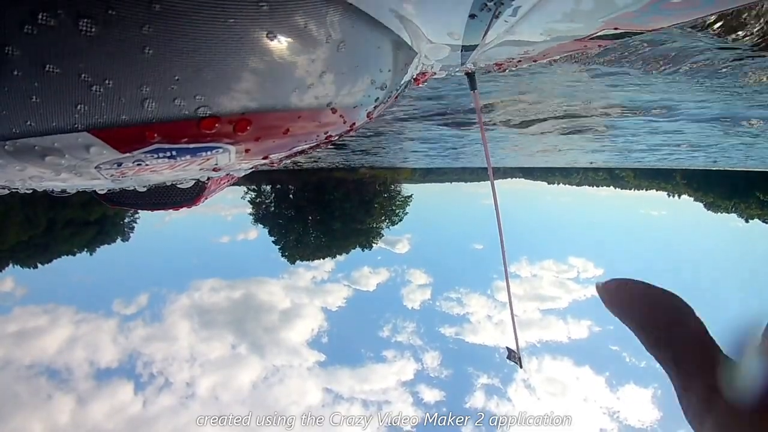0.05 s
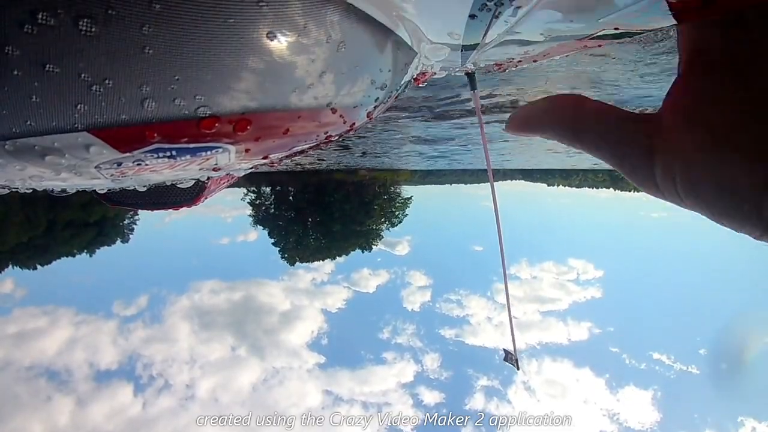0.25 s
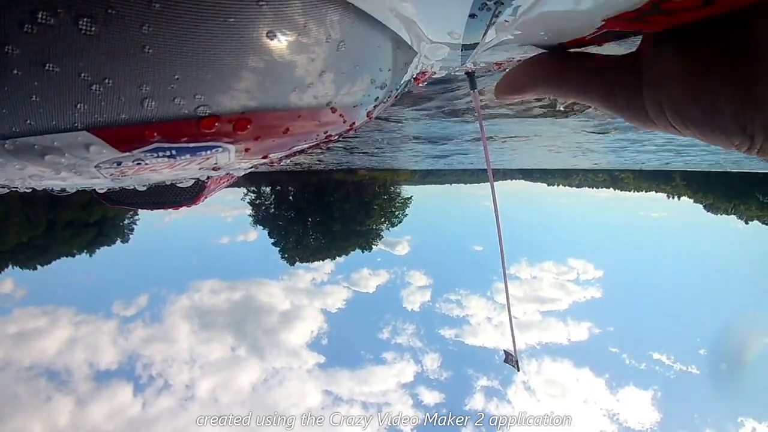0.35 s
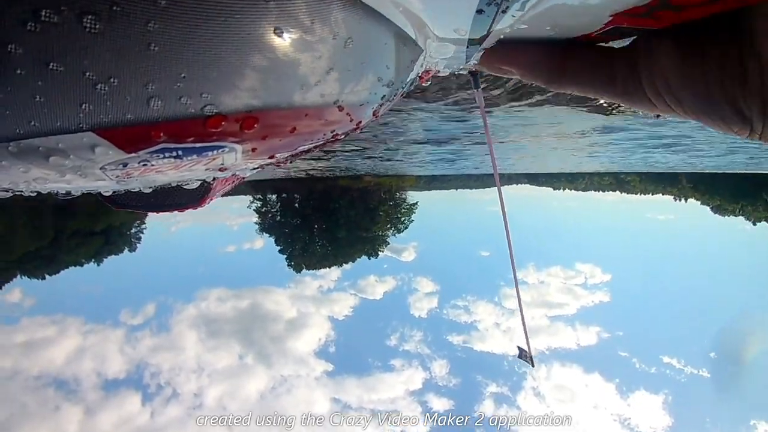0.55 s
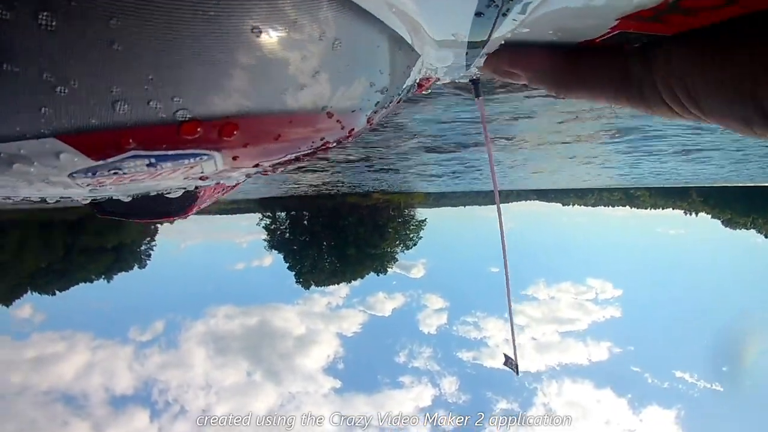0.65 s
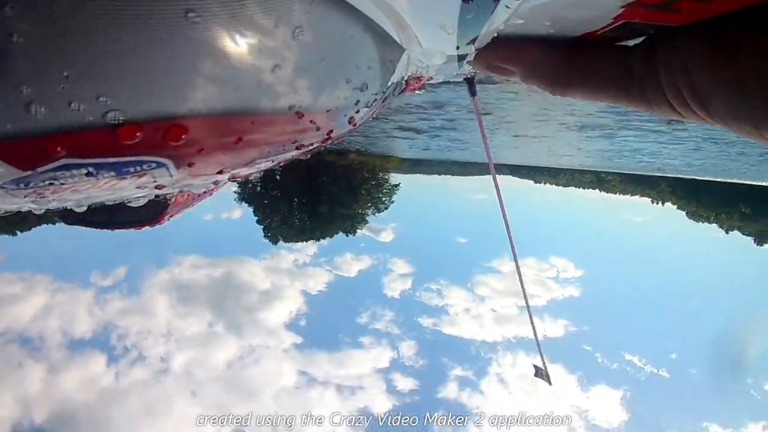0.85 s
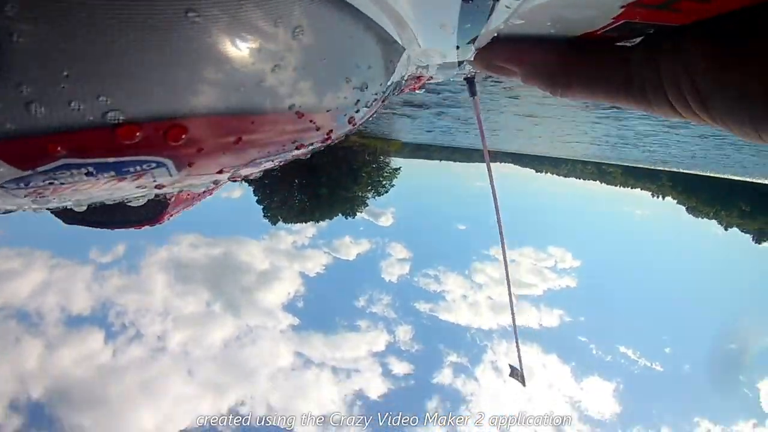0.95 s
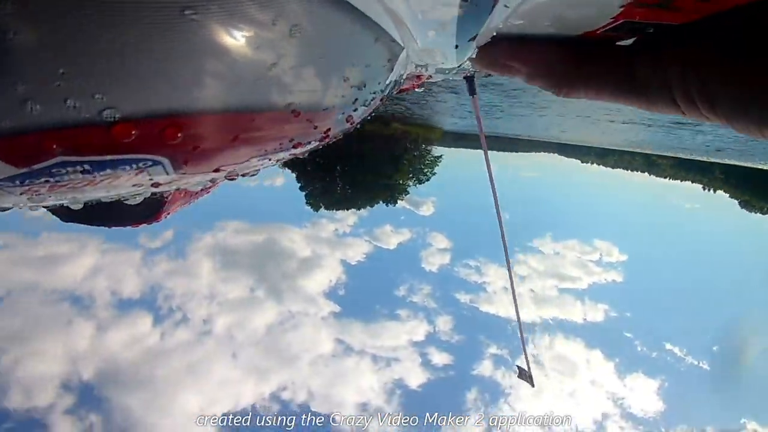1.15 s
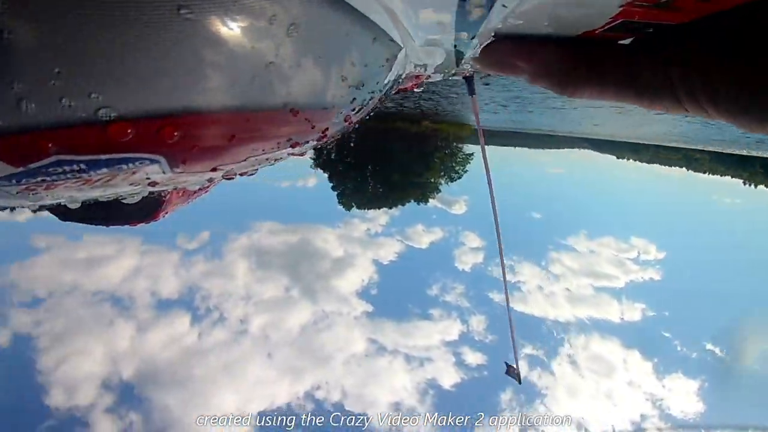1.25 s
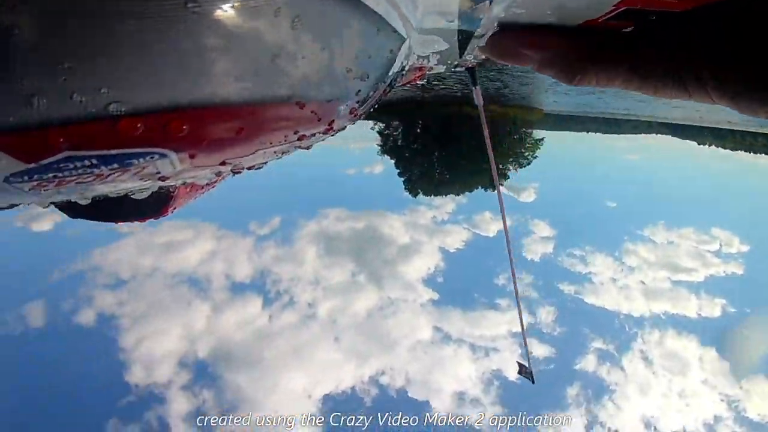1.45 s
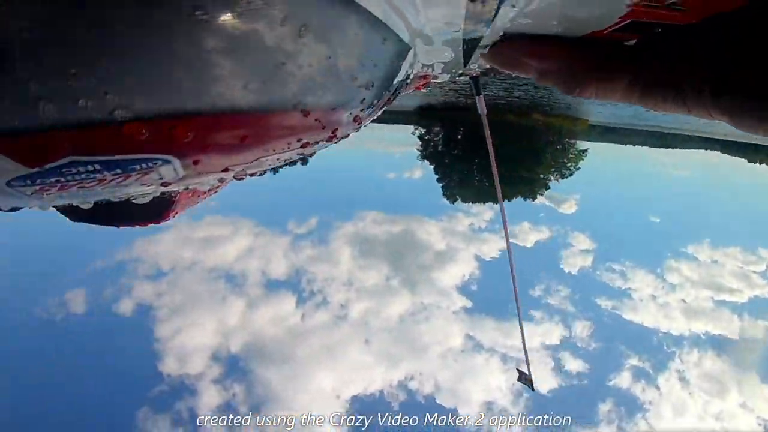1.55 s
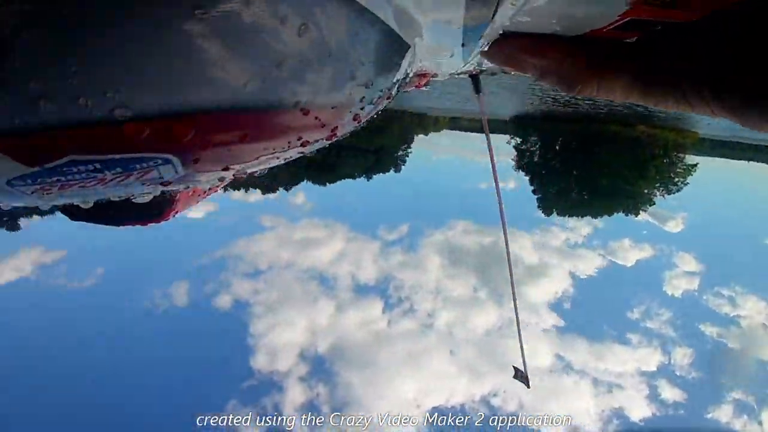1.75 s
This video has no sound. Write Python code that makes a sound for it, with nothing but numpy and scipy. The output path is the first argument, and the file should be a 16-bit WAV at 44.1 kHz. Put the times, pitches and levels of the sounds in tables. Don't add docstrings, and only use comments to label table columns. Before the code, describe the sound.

Close rough handling of a sealed camera case, with rubbing, knocks, thuds and muffled water

```python
import sys
import numpy as np
from scipy import signal
from scipy.io import wavfile
from scipy.ndimage import uniform_filter1d

SR = 44100
rng = np.random.default_rng(int(sys.argv[2]) if len(sys.argv) > 2 else 0)


def file_out(sig):
    cols = np.atleast_2d(sig).T
    lim = np.clip(cols, -1, 1)
    pcm = np.round(lim * 32767).astype(np.int16)
    wavfile.write(sys.argv[1], SR, pcm)


def gain_from_db(level_db):
    decades = np.asarray(level_db, float) / 20
    return 10 ** decades


N = 77175

# (frequency [Hz], level [dB per Hz])
WATER_SPECTRUM = [(150, -33.5), (250, -17.5), (400, 0), (800, -7.5), (1150, -12.5), (2000, -11.5),
                  (2900, -29), (4200, -28), (5500, -31), (15500, -40)]
# (time [s], rub level [dB], mount rumble [dB], rub
# brightness [dB per octave], slow sway [dB])
HAND_MOTION = [(0, -47.5, -50, -1.5, -42), (0.069, -62.5, -51, -5, -88), (0.119, -62, -57, 1.5, -83),
               (0.212, -58, -47.5, -8.5, -70), (0.251, -38.5, -38, -0.5, -70), (0.283, -61, -37, -6.5, -59),
               (.42, -51.5, -43.5, 1, -40), (0.512, -49.5, -44.5, -2.5, -32.5), (0.558, -47, -32, -7.5, -65),
               (0.623, -49.5, -36, -3.5, -27.5), (0.639, -36, -33.5, -1, -33), (.68, -37, -39, 2, -42),
               (0.728, -34.5, -40, 2.5, -35), (0.793, -35, -58, 2, -43), (0.828, -48.5, -46, 1, -33.5),
               (.86, -74.5, -54.5, 8, -54), (1.1, -73.5, -59.5, 1, -58), (1.182, -57.5, -54, -3, -39.5),
               (1.241, -69, -49.5, -1, -49), (1.292, -51.5, -43, -3, -61), (1.34, -73, -51.5, -8.5, -53),
              (1.439, -66.5, -46, 1, -30.5), (1.502, -55, -46.5, 0, -44), (1.54, -78.5, -50, -10, -51.5),
              (1.602, -59, -47, 3.5, -46), (1.658, -78, -54.5, 6, -36.5), (1.75, -62.5, -51, -4, -78)]
# (frequency [Hz], width [Hz], level [dB])
MOUNT_MODES = [(73.4, 44, -1.5), (120, 37, -2), (190, 30.2, -6), (266.7, 36, -14)]
# (start [s], length [s], level [dB], frequency [Hz])
MOUNT_SHUDDERS = [
    (0.604, 0.079, -25.5, 66.2),
    (.63, 0.032, -36.5, 518.4),
    (.64, 0.085, -30.5, 206.4),
    (.7, .11, -41, 529),
    (0.701, 0.095, -25.5, 71.3),
    (.71, 0.092, -36, 194.4),
]
# (time [s], level [dB], frequency [Hz], 60 dB decay [s])
MOUNT_THUDS = [(0.251, -32.5, 321.4, 0.11), (0.252, -32, 190, 0.24), (0.263, -25.5, 120, 0.049),
               (.322, -25.5, 82.2, 0.23), (0.424, -27, 120, 0.077), (0.474, -21.5, 60, 0.063),
               (.49, -35, 190, 0.278), (0.531, -19, 542, 0.027), (.531, -40, 332, 0.034),
               (0.534, -25, 168, 0.082), (0.563, -29, 111.3, 0.33), (0.85, -30, 136.3, 0.15),
               (0.858, -43.5, 186, 0.26), (1.141, -26, 62, 0.14), (1.14, -41, 185, 0.14),
               (1.396, -41.5, 111.6, 0.16), (1.464, -33, 132, 0.2), (1.59, -41.5, 120, 0.33),
               (1.699, -40.5, 102, 0.29)]
# (time [s], level [dB], frequency [Hz], 60 dB decay [s])
CASE_TICKS = [(0.0145, -51, 1660, 0.062), (0.049, -49, 1500, 0.06), (.067, -43, 1500, 0.023),
              (0.2341, -48, 950, 0.099), (0.245, -37, 1545, 0.06), (0.249, -54.5, 3930, 0.029),
              (0.3118, -44, 1167, 0.035), (0.389, -42.5, 1690, 0.096), (0.4, -45, 4180, 0.039),
              (0.439, -53, 1550, 0.18), (0.485, -58.5, 5500, 0.12), (.49, -61, 3520, 0.39),
              (.532, -38.5, 1320, 0.094), (.55, -37.5, 750, 0.13), (.588, -42, 690, 0.14),
              (0.633, -35.5, 1500, 0.078), (.983, -54, 770, 0.039), (1.2973, -41, 2010, 0.049),
              (1.2932, -59.5, 3410, 0.042), (1.447, -42.5, 970, 0.03), (1.478, -40.5, 1667, 0.036),
              (1.477, -37.5, 730, 0.033), (1.475, -53, 3650, 0.023), (1.579, -48, 1820, 0.017),
              (1.59, -47.5, 814, 0.028), (1.6205, -38, 1720, 0.022), (1.6196, -46.5, 3490, 0.015),
              (1.621, -53.5, 6130, 0.018), (1.699, -52, 1500, 0.025),
              (0.6552, -33.5, 1210, 0.033), (0.685, -36, 1720, 0.059), (.777, -37, 1150, 0.031),
              (1.164, -66, 1950, 0.051), (1.181, -52.5, 1040, 0.07), (1.31, -66, 7500, .015),
              (1.383, -56, 1070, .03), (1.403, -48.5, 740, 0.025), (1.428, -50, 700, 0.026),
              (1.447, -47, 1500, 0.025), (1.443, -42.5, 554, 0.04), (1.495, -71, 3600, 0.14),
              (1.58, -67, 3370, 0.018), (1.6225, -59, 4860, 0.0099), (1.6185, -66, 2560, 0.01),
              (1.723, -57, 720, 0.073), (1.723, -55, 1750, 0.036), (1.724, -68, 3500, 0.032),
              (0.249, -62.5, 5970, 0.068), (1.002, -66, 4020, 0.025)]
# (time [s], level [dB], contact [ms])
CASE_KNOCKS = [
    (.2475, -30, .5),
    (.639, -25, .6),
    (.654, -24, .7),
    (.708, -23, .7),
    (1.2972, -10, .8),
]
# (frequency [Hz], level [dB], 60 dB decay [s])
SHELL_MODES = [(60, -18.5, 0.16), (175.5, -2.5, 0.12), (310, 0, 0.018), (495, 4, 0.015),
               (730, -19.5, 0.006), (1060, -1.5, 0.0088), (1580, 7, 0.0076), (2290, -39, .015)]
# (start [s], length [s], level [dB], frequency [Hz])
NARROW_WHISTLES = [(0.27, 0.023, -54.5, 3900), (.229, .027, -54.5, 2600), (.64, 0.062, -72, 5140),
                   (.675, 0.046, -73, 6100), (.735, 0.021, -61, 5800), (.76, 0.081, -66.5, 6410),
                   (.68, 0.18, -78, 6100), (.685, 0.021, -72, 12000), (.725, 0.027, -80, 8720),
                   (.755, 0.056, -75, 8800), (.7, 0.034, -50, 3900), (.76, .045, -55.5, 3200),
                   (.71, 0.038, -38.5, 1870), (1.29, 0.016, -52, 3400), (1.28, 0.04, -71, 4200),
                   (1.283, 0.035, -66, 8700), (1.285, 0.029, -72, 12300), (1.285, .032, -72, 16000),
                   (.625, .035, -72, 13500)]
# (time [s], level [dB], brightness [dB per octave])
SKIN_SNAPS = [(0.2448, -26, 10), (0.3905, -36, 6), (0.5327, -37, 1), (0.6364, -28, -1), (0.6544, -35, 2),
              (0.6684, -35, 3), (0.6853, -29.5, -1), (0.7024, -30, 2), (0.7094, -25.5, 3), (0.7174, -19, 4),
              (0.7364, -32, 3), (0.7424, -28, 1), (0.7514, -35, 3), (0.7704, -35, 3), (0.7771, -21, -7),
              (0.7874, -32, 3), (0.7974, -39, 5), (1.2965, -32, 10.5), (1.479, -39, 1), (1.5808, -42, 2),
              (1.6207, -38.5, 3)]
# (frequency [Hz], width [Hz], level [dB])
HOUSING_MODES = [(379, 114, -4.5), (527, 92, -2), (673, 149, -3), (930, 153, -4), (1148, 150, -7.5),
                 (1525, 180, -6), (1888, 400, -4.5), (2401, 155, -18), (3500, 840, -16.5), (4130, 310, -24),
                 (4890, 570, -31.5), (6410, 70, -39.5)]
# (start [s], length [s], cut [Hz], one band left [Hz])
TREBLE_DROPOUTS = [
    (.004, .012, 2300, 4200),
    (.128, .016, 2200, 2600),
    (.231, .014, 2900, 3850),
    (.598, .017, 2300, 3550),
    (1.688, .016, 2100, 3750),
]

PIVOT_HZ = 1500


def evened(x):
    return x / np.sqrt(np.mean(x ** 2) + 1e-20)


def add(mix, s, sound):
    part = mix[round(s * SR):][:len(sound)]
    part += sound[:len(part)]


def resonate(x, hz, width):
    turn = np.exp(2j * np.pi * hz * np.arange(len(x)) / SR)
    r = np.exp(-np.pi * width / SR)
    smooth = signal.lfilter([(1 - r) ** 2], [1, -2 * r, r * r], x / turn)
    return 2 * (turn * smooth).real


def handling(column):
    rows = np.array(HAND_MOTION)
    return np.interp(np.arange(N) / SR, rows[:, 0], rows[:, column])


def wandering(knots, step_s):
    return np.interp(np.arange(N) / SR, np.arange(len(knots)) * step_s, knots)


def water_wash():
    port_hz, port_width_hz, port_db, patch_db = 1580, 170, 11.5, 2
    hz = np.fft.rfftfreq(512, 1 / SR)
    real, imaginary, patches = rng.standard_normal((N // 128 + 6, 257, 3)).T
    patches = uniform_filter1d(uniform_filter1d(patches, size=8, axis=0), size=14, axis=1)
    f, db = np.transpose(WATER_SPECTRUM)
    shape = np.interp(np.log(hz + 1), np.log(f), db)
    shape += port_db * np.exp(-((hz - port_hz) / port_width_hz) ** 2)
    z = (real + 1j * imaginary) * gain_from_db(shape[:, None] + patch_db * evened(patches))
    return gain_from_db(-63) * evened(signal.istft(z, nperseg=512, noverlap=384)[1][:N])


def mount_rumble():
    sway = evened(resonate(rng.standard_normal(N), 32.3, width=28.3))
    shaking = rng.standard_normal(N)
    modes = evened(sum(gain_from_db(db) * evened(resonate(shaking, hz, w)) for hz, w, db in MOUNT_MODES))
    return gain_from_db(handling(column=2)) * modes + gain_from_db(handling(column=4)) * sway


def mount_shudder(length, db, hz):
    t = np.arange(0, length, 1 / SR)
    return gain_from_db(db) * np.sqrt(np.sin(np.pi * t / length)) * np.sin(2 * np.pi * hz * t)


def mount_thud(db, hz, t60):
    t = np.arange(SR // 2) / SR
    rise_cycles = 0.24
    rise = 1 - np.exp(-t * hz / rise_cycles)
    return gain_from_db(db - 60 * t / t60) * rise * np.sin(2 * np.pi * hz * t)


def tick(db, hz, t60, noise):
    t = np.arange(len(noise)) / SR
    puff = evened(resonate(noise, hz, width=9.8 * np.sqrt(hz)))
    return gain_from_db(db - 60 * t / t60) * np.minimum(t / 0.0006, 1) * puff


def case_knock(db, contact_ms):
    t = np.arange(SR // 4) / SR
    push = np.sin(np.pi * np.minimum(t[:200] / (contact_ms / 1000), 1)) ** 2
    ring = sum(gain_from_db(d - 60 * t / t60) * np.sin(2 * np.pi * hz * t) for hz, d, t60 in SHELL_MODES)
    hit = np.convolve(push, ring)
    return -gain_from_db(db) * hit / abs(hit).max()


def narrow_whistle(length, db, hz, noise):
    t = np.arange(0, length, 1 / SR)
    whistle = resonate(noise, hz, width=2.4 * np.sqrt(hz))
    line = evened(whistle[-len(t):])
    return gain_from_db(db) * np.sqrt(np.sin(np.pi * t / length)) * line


def skin_snap(db, tilt):
    t = np.arange(SR // 30) / SR
    ring = np.zeros(len(t))
    for hz, w, d in HOUSING_MODES[3:]:
        decay = np.exp(-np.pi * 0.5 * w * t)
        level = gain_from_db(d + tilt * np.log2(hz / PIVOT_HZ)) * np.sqrt(w)
        ring += level * decay * np.sin(2 * np.pi * hz * t)
    return gain_from_db(db - 8.5) * ring / abs(ring).max()


def finger_rub():
    slips_per_s, slip_spread_db, hiss_db = 3600, 4.5, 1
    chatter_db, chatter_s = 3.5, 0.003
    wander_db, wander_s = 1.8, 0.03
    size = gain_from_db(slip_spread_db * np.minimum(rng.exponential(1, N), 5)) * rng.choice([-1., 1.], N)
    slips = evened(size * (rng.random(N) < slips_per_s / SR))
    drive = slips + gain_from_db(hiss_db) * rng.standard_normal(N)
    drive *= gain_from_db(chatter_db * wandering(rng.standard_normal(800), chatter_s))
    brightness = handling(column=3)
    out = np.zeros(N)
    for hz, w, db in HOUSING_MODES:
        wander = wander_db * wandering(rng.standard_normal(120), wander_s)
        level = gain_from_db(db + wander + brightness * np.log2(hz / PIVOT_HZ))
        out += level * evened(resonate(drive, hz, w))
    return gain_from_db(handling(column=1) - 2) * out


def treble_grit(x):
    smooth_s, spread_db, low_hz, power = 0.033, 1.5, 4500, 1.62
    turn, strength, u = rng.random((N // 256 + 6, 513, 3)).T
    hz = np.fft.rfftfreq(1024, 1 / SR)[:, None]
    size = np.repeat(-np.log(u[:, ::4] + 1e-9), 4, axis=1)[:, :u.shape[1]]
    z = np.exp(2j * np.pi * turn) * strength * gain_from_db(spread_db * np.minimum(size, 2.5))
    z = z / (1 + (low_hz / (hz + 1)) ** 8)
    mids = signal.sosfilt(signal.butter(2, 250, "high", fs=SR, output="sos"), x)
    level = abs(uniform_filter1d(mids ** 2, int(smooth_s * SR))) ** (power / 2)
    return gain_from_db(-17) * level * evened(signal.istft(z, nperseg=1024, noverlap=768)[1][:N])


def thinned(x):
    from_hz, share, skip_db = 4700, 0.6, -16
    hz, t, z = signal.stft(x, SR, nperseg=1024, noverlap=768)
    draw = rng.random((80, 256)).T
    draw = draw.repeat(2, axis=0).repeat(6, axis=1)[:512, :len(t)]
    draw = np.vstack([draw, draw[:1]])
    skip = draw < share * np.clip((hz[:, None] - from_hz) / 600, 0, 1)
    return signal.istft(z * gain_from_db(skip_db * skip), SR, nperseg=1024, noverlap=768)[1][:, :N]


def starved(x):
    t = np.arange(N) / SR
    out = x.copy()
    for s, length, cut_hz, kept_hz in TREBLE_DROPOUTS:
        gate = np.clip(np.minimum(t - s, s + length - t) / 0.00068 + 0.5, 0, 1)
        dull = signal.sosfiltfilt(signal.butter(6, cut_hz, fs=SR, output="sos"), x)
        kept = gain_from_db(8) * resonate(x[0], kept_hz, width=200)
        out += gate * (dull + kept - x)
    return out


def scene():
    mix = water_wash() + mount_rumble()
    for s, *row in MOUNT_SHUDDERS:
        add(mix, s, mount_shudder(*row))
    for s, *row in MOUNT_THUDS:
        add(mix, s, mount_thud(*row))
    for s, *row in CASE_TICKS:
        add(mix, s, tick(*row, rng.standard_normal(6000)))
    for s, *row in CASE_KNOCKS:
        add(mix, s, case_knock(*row))
    for s, *row in NARROW_WHISTLES:
        add(mix, s, narrow_whistle(*row, rng.standard_normal(12000)))
    for s, *row in SKIN_SNAPS:
        add(mix, s, skin_snap(*row))
    mix += finger_rub()
    return mix[None]


def low_pass(x):
    return signal.sosfilt(signal.butter(12, 15620, fs=SR, output="sos"), x)


def record(dry):
    low_cut = signal.butter(2, 18, "high", fs=SR, output="sos")
    x = signal.sosfilt(low_cut, dry)
    gritty = x + treble_grit(x)
    return low_pass(starved(thinned(gritty)))


dry = scene()
out = record(dry)
file_out(out)
```